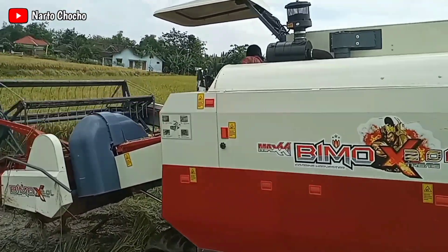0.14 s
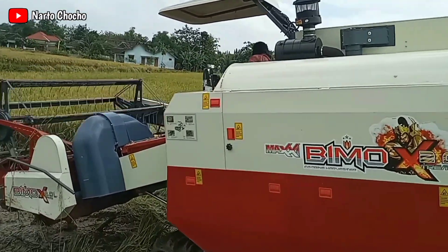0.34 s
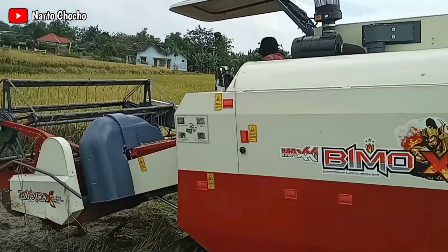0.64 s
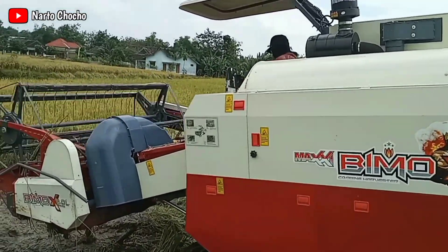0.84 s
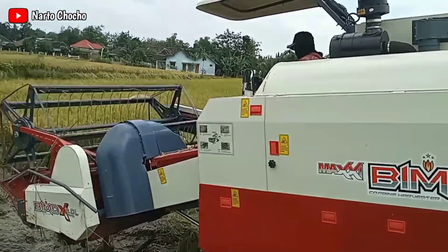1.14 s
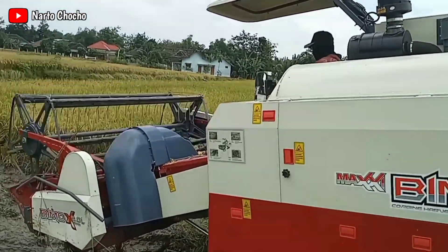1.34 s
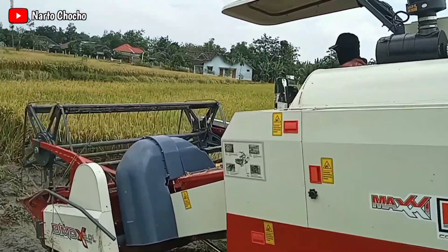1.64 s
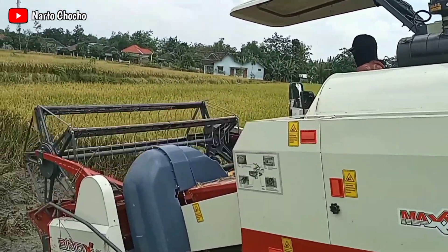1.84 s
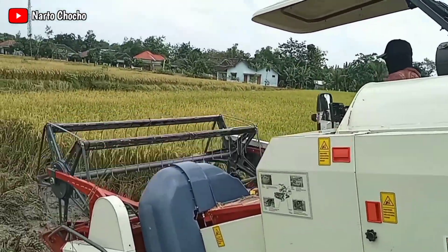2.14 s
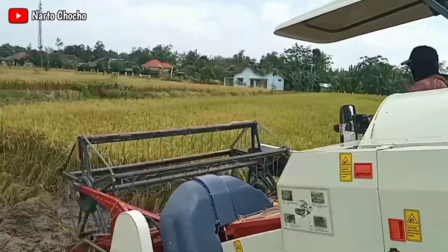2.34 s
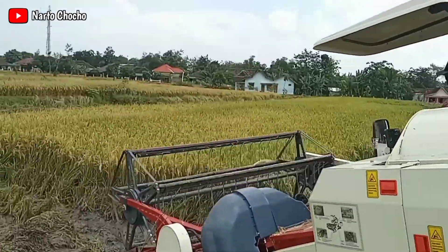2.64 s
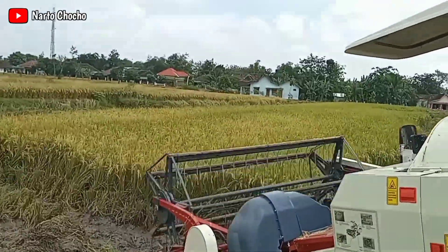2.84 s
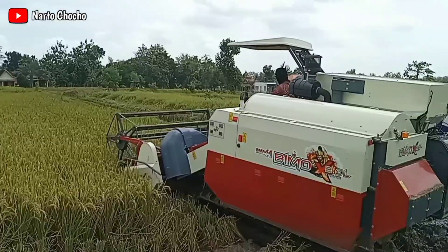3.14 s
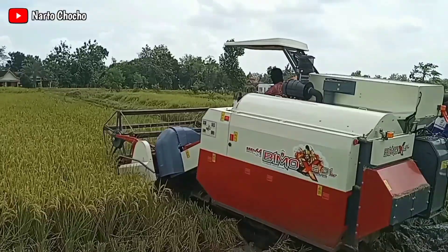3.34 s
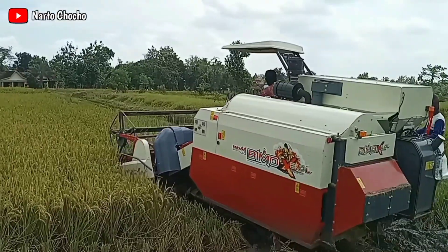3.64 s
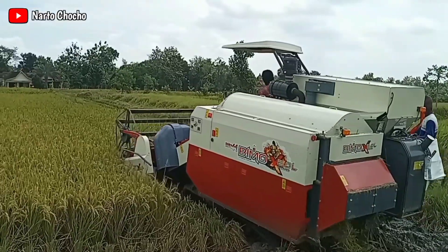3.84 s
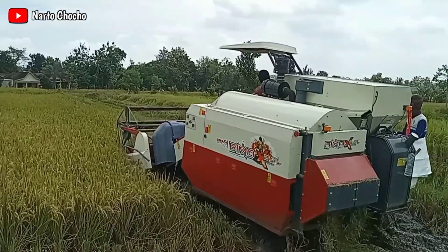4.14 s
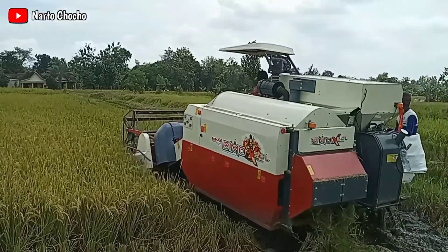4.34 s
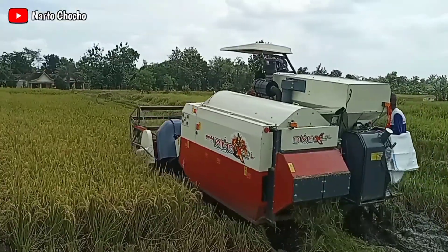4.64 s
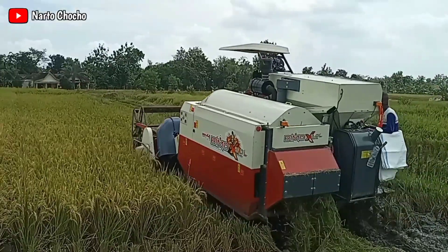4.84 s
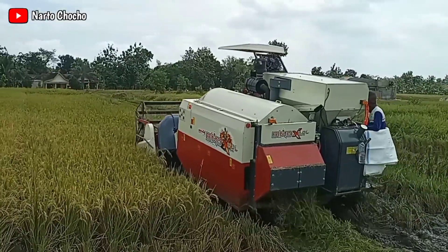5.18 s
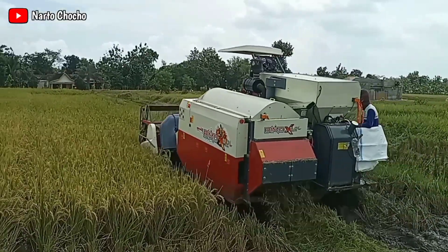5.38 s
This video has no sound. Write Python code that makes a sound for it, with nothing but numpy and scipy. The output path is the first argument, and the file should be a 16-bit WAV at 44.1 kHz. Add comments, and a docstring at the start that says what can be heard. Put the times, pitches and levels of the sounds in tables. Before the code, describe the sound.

Heard close from its side in a rice field, a combine harvester runs with a steady diesel drone, a faint gear whine and a fast, pulsing threshing clatter. Straw hiss swells as bunches of crop pass through. After a sudden short gap, the machine returns, heard from behind, with a ringing metal housing and increasingly frequent dull thuds that briefly push the overall level down.

```python
"""A diesel combine harvester cuts rice close by, heard from its side and, after a short silence, its rear.
The engine drones and the gears whine under the roar and clatter of crop hitting the steel casing,
which throbs with each turn of the threshing drum. Dry straw hisses and crackles, wads of it thud
through, and at the rear the sheet-metal housing rings. Bunches of crop swell the clatter and hiss.
An automatic volume control turns everything down after each heavy thud."""
import sys
import numpy as np
from scipy import signal
from scipy.fft import rfft, irfft
from scipy.io import wavfile
from scipy.ndimage import uniform_filter1d

SR = 44100
rng = np.random.default_rng(int(sys.argv[2]) if len(sys.argv) > 2 else 0)


def to_wav(sig):
    """Store sig (one row per channel, or 1-D mono) as 16-bit WAV at the path in sys.argv[1].

    Samples outside -1..1 are clipped; the rate is SR.
    """
    pcm = np.clip(np.atleast_2d(sig), -1, 1) * 32767
    pcm = np.round(pcm).astype(np.int16)
    wavfile.write(sys.argv[1], SR, pcm.T)  # frames by channels


N = 242991
TIME = np.arange(N) / SR
FREQ = np.fft.rfftfreq(N, 1 / SR)
SIDE_END_S, REAR_START_S = 3.018, 3.361
HIGHEST_HZ = 15560

# How fast the engine fires; it slows as it takes up load: time_s, rate_hz
FIRING_RATE = [(0, 85.9), (1.0, 85.7), (1.85, 85.2), (3.0, 83.7), (3.4, 81.3), (5.5, 80.9)]
# The exhaust's overtones: multiple_of_firing_rate, relative_db
EXHAUST_OVERTONES = [(1.25, -16.5), (1.5, -14.5), (2, 4), (2.25, -10), (2.5, -11), (3, -3), (3.25, -18),
                     (4, -2), (5, -7.5), (6, -5), (6.25, -14.5), (7, -3.5), (8, -20)]
# The tones of the belt-driven fan: multiple_of_firing_rate, level_db
FAN_TONES = [(1.785, -29.5), (3.57, -33.5), (4.6, -40.5)]
# Each layer's base level, drifting as the machine drives on: layer -> start_db, drift_db_per_s
SIDE_LEVELS = {"roar": (-17, -.35), "clatter": (-18, .25), "hiss": (-29, 0.5), "sizzle": (-46.5, 1)}
REAR_LEVELS = {"roar": (-18, .5), "clatter": (-21, .1), "hiss": (-29, -0.53), "sizzle": (-39.5, -1.3)}
# Bunches of crop passing through: middle_s, length_s, clatter_swell_db, hiss_swell_db
CROP_BUNCHES = [(1.33, 0.18, 2, 2.3), (1.514, .2, 1.5, 1.2), (2.054, 0.48, 0.5, 1), (2.222, .18, 2, 2),
                (2.435, .2, 0, 1.2), (2.878, 0.43, 1.5, 3), (3.59, 1, 0.5, 4), (3.892, 0.15, 2.5, -1),
                (4.43, 0.24, 1.1, 0.5), (4.874, 0.11, 3.5, 1), (5.096, 0.2, 1.8, 0.5),
                (5.47, 0.12, 2.2, 2.5)]
# The tone colour of the roar and clatter: frequency_hz, relative_db
THRESHER_SIDE = [(20, -30.5), (55, -20), (80, -6), (130, -1), (260, 0.3), (340, -4), (420, -3), (620, -6),
                 (780, -5), (1450, -1.5), (1850, -3.5), (2200, -9.5), (3400, -13.5), (6000, -38)]
THRESHER_REAR = [(20, -28), (52, -13), (82, .5), (160, 4), (240, 0.5), (335, 2), (410, -5.5), (620, -2),
                 (830, -8.5), (1100, -3.5), (1400, -7), (1900, -7.5), (2400, -10), (3500, -16.5),
                 (6000, -27.5)]
# The tone colour of the straw's hiss: frequency_hz, relative_db
STRAW_SIDE = [(2500, -21.5), (3900, -4), (4700, -4.5), (5600, 0), (7300, 1), (8000, -6), (9500, -10),
              (11000, -16), (13800, -20)]
STRAW_REAR = [(2500, -24), (4400, -0.5), (5400, -2), (6600, 5.5), (7400, 3), (8200, -5.5), (10000, -10.5),
              (13800, -17)]
# Wads of straw hitting the casing: start_s, relative_db, pitch_hz
STRAW_WADS = [(0.187, -12, 162), (2.276, -3.5, 191), (3.655, -2.5, 141), (3.993, 0.5, 106),
              (4.497, -5.5, 150), (4.509, 0.5, 151), (4.538, -1.5, 248), (4.545, -1.5, 155),
              (4.575, 0, 166), (4.66, -3, 267), (4.846, -0.5, 190), (4.866, -6, 237), (4.907, -6, 295),
              (4.924, -4.5, 110), (4.99, -3, 177), (5.066, -17, 130), (5.08, -9, 160), (5.137, -1.5, 213),
              (5.19, -2.5, 120), (5.256, -3, 207), (5.272, -6, 218)]
# Where the rear housing rings: pitch_hz, rough_width_hz, from_corner_relative_db, from_behind_relative_db
HOUSING_RINGS = [(663, 53, -28.5, -31.5), (1217, 49, -29.5, -35), (1644, 95, -27, -30),
                 (1763, 44, -32, -28), (2093, 81, -28, -31), (2577, 140, -28.5, -36.5),
                 (2736, 84, -34, -40), (3053, 100, -39, -32.5), (3245, 50, -42, -40), (3580, 75, -54, -37),
                 (3960, 190, -40.5, -35.5)]
# The ringing grows as the open rear comes into view: time_s, change_db
RING_GROWTH = [(3.4, -3.5), (3.8, 0)]


def amp(db):
    """Turns decibels into a number to multiply by."""
    return 10 ** (np.asarray(db) / 20)


def unit(x):
    """Scales a signal so its average strength (rms) is one."""
    return x / np.sqrt(np.mean(x ** 2) + 1e-20)


def follow(rows):
    """Joins (time, value) points with straight lines, one value for each sample."""
    return np.interp(TIME, *np.transpose(rows))


def colour_gain(points, fall_db_per_octave=30):
    """Turns a tone colour into a gain for every frequency, falling away above its last point."""
    hz, db = np.transpose(points)
    octaves_above = np.log2(np.maximum(FREQ / hz[-1], 1))
    return amp(np.interp(np.log(FREQ + 1), np.log(hz), db) - fall_db_per_octave * octaves_above)


def filtered(x, gain):
    """Makes each frequency louder or softer by its own gain."""
    return irfft(rfft(x) * gain, N)


def change_treble(x, hz, db):
    """Turns everything above hz up or down by db."""
    treble = filtered(x, 1 - 1 / (1 + (FREQ / hz) ** 12))
    return x + treble * (amp(db) - 1)


def wander(hz):
    """A random wobble of strength one, mostly slower than hz."""
    return unit(filtered(rng.standard_normal(N), np.exp(-(FREQ / hz) ** 2) * (FREQ > 0)))


def swell(middle_s, length_s, db):
    """One smooth rise and fall, in dB."""
    return db * np.cos(np.pi * np.clip((TIME - middle_s) / length_s, -.5, .5)) ** 2


def engine(speed_wobble=0.0023, recede_db_per_s=0.5):
    """Four cylinders fire in turn; uneven strokes add tones between the harmonics. A belt turns the fan."""
    firings = np.cumsum(follow(FIRING_RATE) * (1 + speed_wobble * wander(11.1))) / SR

    def tones(rows, waver, waver_hz):
        """Tones that follow the firing rate, each wavering in loudness."""
        return sum(amp(db) * (1 + waver * wander(waver_hz))
                   * np.sin(2 * np.pi * (multiple * firings + rng.random())) for multiple, db in rows)

    # The machine's body moves in front of the exhaust; later the exhaust draws away.
    hiding_s = (2.0, 2.25)
    receded_db = recede_db_per_s * np.maximum(TIME - REAR_START_S, 0)
    hum_db = np.interp(TIME, hiding_s, (-26.5, -27.5)) - receded_db
    overtones_db = np.interp(TIME, hiding_s, (-21.3, -27.5)) - receded_db
    hum = amp(hum_db + 1.2 * wander(3.2)) * np.sqrt(2) * np.sin(2 * np.pi * firings)
    overtones = amp(overtones_db) * unit(tones(EXHAUST_OVERTONES, waver=0.38, waver_hz=7.9))
    fan = tones(FAN_TONES, waver=0.4, waver_hz=2.1)
    return hum + overtones + fan


def gearbox(pitch_hz=1300, level_db=-39):
    """Gear teeth meet and make a thin, unsteady whine."""
    cycles = np.cumsum(pitch_hz * (1 + 0.006 * wander(16))) / SR
    return amp(level_db) * (1 + 0.68 * wander(14)) * np.sin(2 * np.pi * cycles)


def crop_flow(base_levels, start_s):
    """Each layer's level in dB: all drift, and bunches of crop swell the clatter, hiss and sizzle."""
    levels = {layer: db + drift * (TIME - start_s) for layer, (db, drift) in base_levels.items()}
    for middle_s, length_s, clatter_db, hiss_db in CROP_BUNCHES:
        levels["clatter"] += swell(middle_s, length_s, clatter_db)
        levels["hiss"] += swell(middle_s, length_s, hiss_db)
        levels["sizzle"] += 0.6 * swell(middle_s, length_s, hiss_db)
    levels["sizzle"] += swell(middle_s=4.32, length_s=0.39, db=7)  # the sizzle flares once
    return levels


def drum_throb(beat_s, turns_per_s, depth_db):
    """The uneven swing in level, in dB, as the threshing drum beats the crop once a turn."""
    return depth_db * (1 + 0.421 * wander(5)) * np.cos(2 * np.pi * turns_per_s * (TIME - beat_s))


def impacts(per_s, spread_db, air):
    """A shower of tiny hits, a few of them large, mixed with a smooth rush of air."""
    sizes = amp(spread_db * np.minimum(rng.exponential(1, N), 4))
    hits = sizes * rng.choice([-1, 1], N) * (rng.random(N) < per_s / SR)
    return unit(unit(hits) + air * rng.standard_normal(N))


def casing_echoes(x, echo, reach_s=0.016, creep=0.000201, count=12):
    """Sound bounces off steel panels; the paths creep as the machine moves, so the tone colour shifts."""
    bounces = np.zeros(N)
    for distance, drift, flip in rng.random((count, 3)):
        delay_s = reach_s * distance + creep * (2 * drift - 1) * TIME
        bounces += np.sign(flip - .5) * np.interp(TIME - delay_s, TIME, x)
    return unit(unit(x) + echo * unit(bounces))


def thresher(levels, colour, throb_db, brighten_db=0, split_hz=800):
    """Crop and grain pelt the casing: big panels give a low roar, sieves and chains a higher clatter."""
    gain = colour_gain(colour)
    lows = 1 / np.sqrt(1 + (FREQ / split_hz) ** 8)
    highs = np.sqrt(1 - lows ** 2)
    panels = filtered(impacts(per_s=900, spread_db=3.4, air=1.2), gain * lows)
    panels = casing_echoes(panels, echo=0.31, reach_s=0.04)
    sieves = filtered(impacts(per_s=1100, spread_db=1.42, air=1.48), gain * highs)
    sieves = casing_echoes(sieves, echo=0.22)
    sieves = unit(change_treble(sieves, hz=2100, db=brighten_db))
    roar = panels * amp(levels["roar"] + 0.5 * throb_db + wander(32))
    clatter = sieves * amp(levels["clatter"] + throb_db)
    return roar + clatter


def straw(levels, colour, throb_db, shade_db=0):
    """Dry stalks snap and rub in the cutter and blower; the machine's body can shade the highest hiss."""
    snaps = filtered(impacts(per_s=3500, spread_db=3.1, air=1.6), colour_gain(colour))
    hiss = casing_echoes(snaps, echo=0.25)
    return change_treble(hiss, hz=10000, db=shade_db) * amp(levels["hiss"] + 0.9 * throb_db)


def sizzle(levels):
    """A narrow, wavering band of very high hiss."""
    band = 1 / (1 + (FREQ / 14550 + .01) ** -90) * (FREQ < HIGHEST_HZ)
    fizz = filtered(impacts(per_s=3500, spread_db=3.0, air=1.5), band)
    return unit(fizz) * amp(levels["sizzle"] - 1.2 * wander(6))


def thuds(rise_s=0.0026, gain_db=-0.5, bass_cut_hz=80):
    """Each wad of straw gives the casing a dull, short push; the panels give off no deep bass."""
    out = np.zeros(N)
    t = np.arange(SR // 20) / SR
    push = t / rise_s * np.exp(1 - t / rise_s)
    for start_s, db, hz in STRAW_WADS:
        angle = 2 * np.pi * hz * t
        thud = amp(db + gain_db) * push * (np.sin(angle) + 0.39 * np.sin(2.24 * angle))
        slot = out[round(start_s * SR):][:len(t)]
        slot += thud[:len(slot)]
    return signal.sosfilt(signal.butter(3, bass_cut_hz, "high", fs=SR, output="sos"), out)


def housing(levels, gain_db=-1.0, waver_db=1.5, turn_s=(4.48, 4.53)):
    """The clatter makes the open rear ring; other pitches stand out as the machine turns away."""
    rings = np.zeros(N)
    for hz, width_hz, corner_db, behind_db in HOUSING_RINGS:
        peak = 1 / (1 + ((FREQ - hz) / (0.62 * width_hz)) ** 2)
        ring = unit(filtered(rng.standard_normal(N), peak))
        ring_db = np.interp(TIME, turn_s, (corner_db, behind_db))
        rings += ring * amp(ring_db + waver_db * wander(7.9))
    extra_clatter_db = levels["clatter"] - levels["clatter"][TIME > REAR_START_S].mean()
    return rings * amp(gain_db + follow(RING_GROWTH) + 0.85 * extra_clatter_db)


def scene(brighten_db_per_s=0.6, shade_db_per_s=-0.5):
    """The side of the machine, a sudden silence, then its rear fading in."""
    side_throb = drum_throb(beat_s=0.011, turns_per_s=15.2, depth_db=0.95)
    rear_throb = drum_throb(beat_s=4.03, turns_per_s=14.8, depth_db=0.75)
    # The clatter brightens as the cutter comes into view.
    levels = crop_flow(SIDE_LEVELS, start_s=0)
    side = thresher(levels, THRESHER_SIDE, side_throb, brighten_db=brighten_db_per_s * TIME)
    side += straw(levels, STRAW_SIDE, side_throb) + sizzle(levels)
    # The hiss dulls as the rear drives off.
    rear_time = TIME - REAR_START_S
    levels = crop_flow(REAR_LEVELS, REAR_START_S)
    rear = thresher(levels, THRESHER_REAR, rear_throb)
    rear += straw(levels, STRAW_REAR, rear_throb, shade_db=shade_db_per_s * rear_time)
    rear += sizzle(levels) + housing(levels)
    both_views = engine() + gearbox() + thuds()
    side_fade = np.clip((SIDE_END_S - TIME) / 0.002, 0, 1)
    rear_fade = np.minimum(0.052 + rear_time / 0.31, 1) * (rear_time > 0)
    return (side_fade * (side + both_views) + rear_fade * (rear + both_views))[None]


def record(dry, limit_db=-9.0, recover_db_per_s=21.5, cut_share=0.8, ceiling=0.83):
    """The volume dips after a loud thud and creeps back; peaks are rounded and the top treble is cut."""
    power_db = 10 * np.log10(abs(uniform_filter1d(dry[0] ** 2, size=353)) + 1e-12)
    # Remember the loudest moment and slowly forget it; take away a share of what is over the limit.
    recovery_db = recover_db_per_s * TIME
    remembered_db = np.maximum.accumulate(power_db + recovery_db) - recovery_db
    over_db = np.maximum(remembered_db - limit_db, 0)
    turned_down = dry * amp(-cut_share * uniform_filter1d(over_db, size=130))
    rounded = turned_down / (1 + (turned_down / ceiling) ** 8) ** (1 / 8)
    treble_cut = signal.firwin(701, HIGHEST_HZ, window=("kaiser", 9), fs=SR)
    return signal.oaconvolve(rounded, treble_cut[None], "same")


dry = scene()
out = record(dry)
to_wav(out)
```